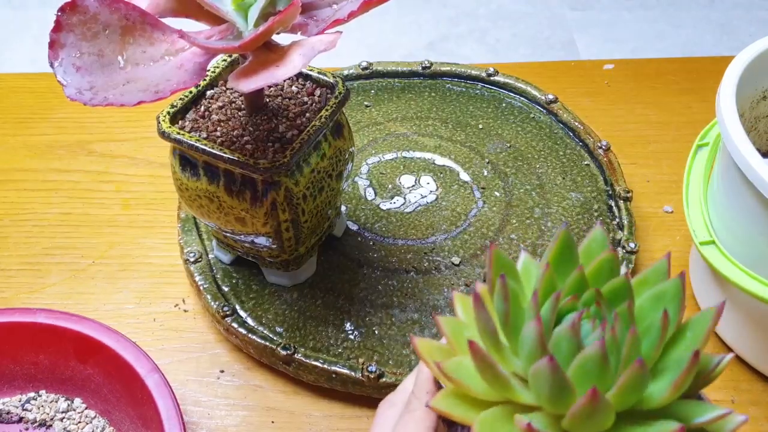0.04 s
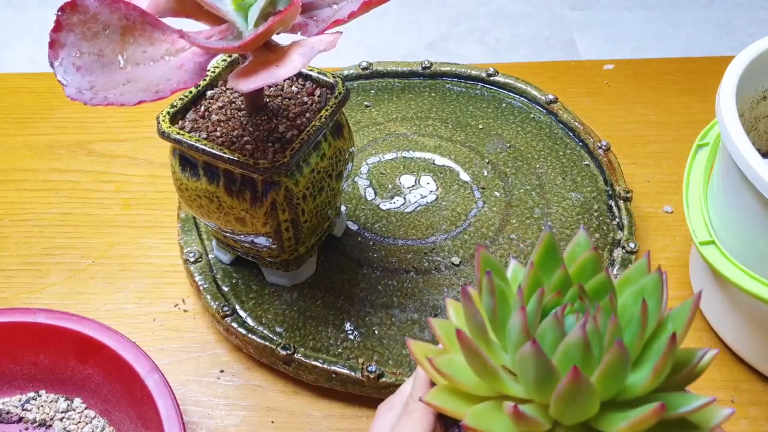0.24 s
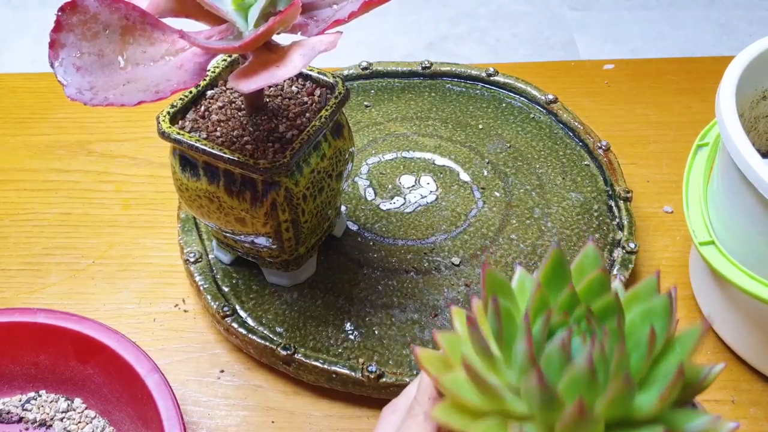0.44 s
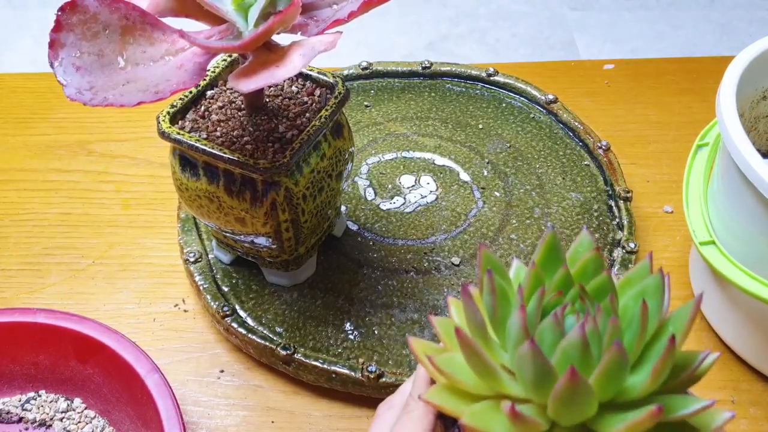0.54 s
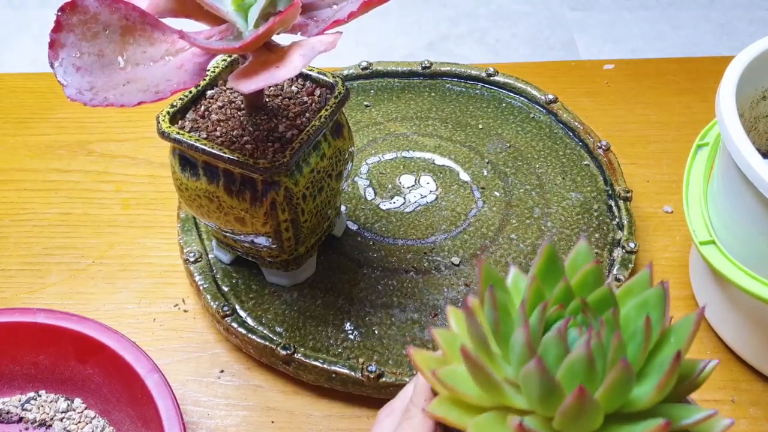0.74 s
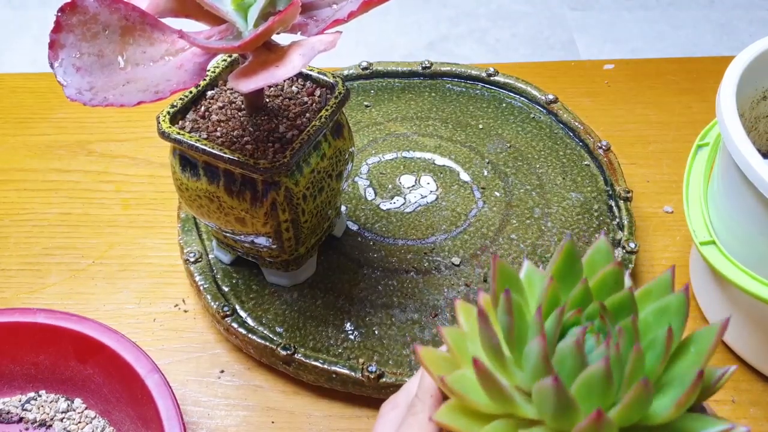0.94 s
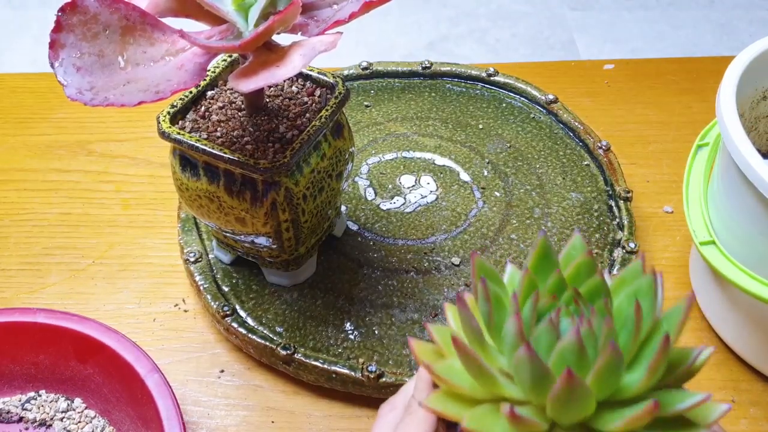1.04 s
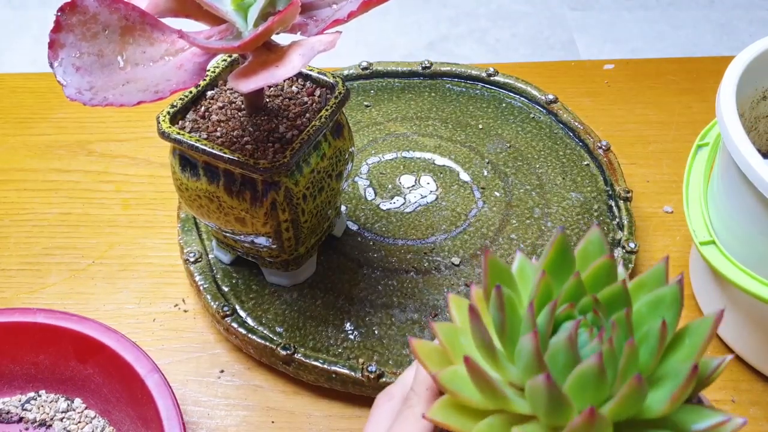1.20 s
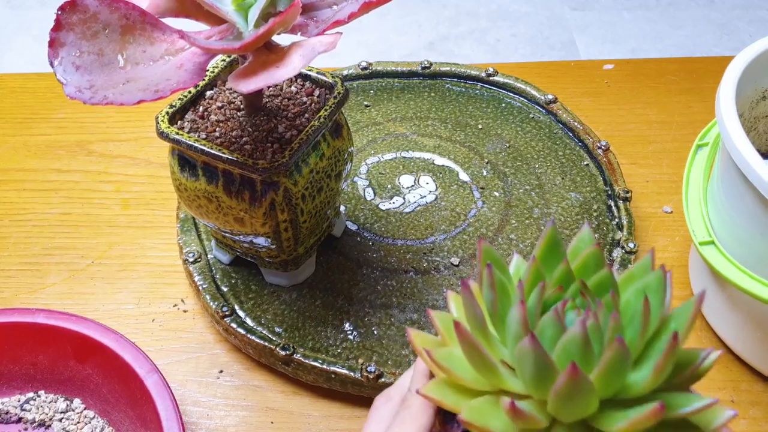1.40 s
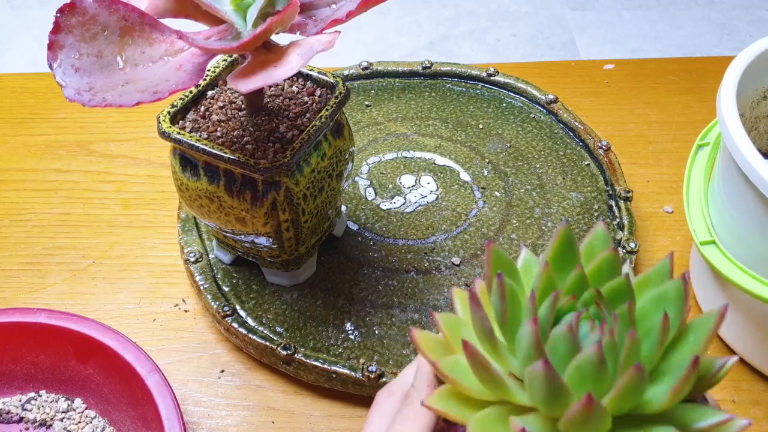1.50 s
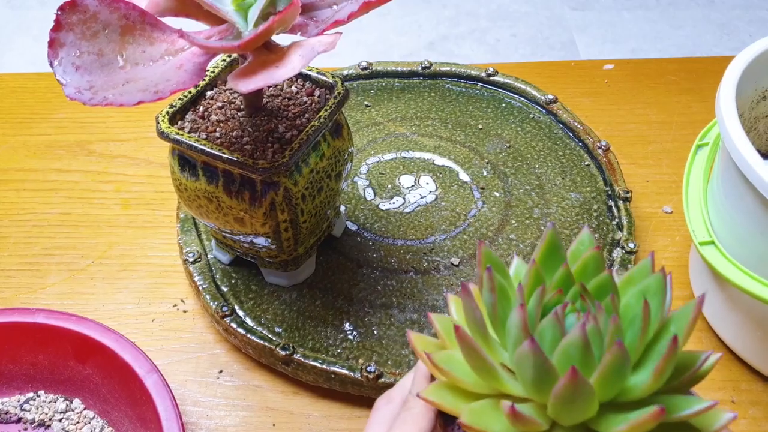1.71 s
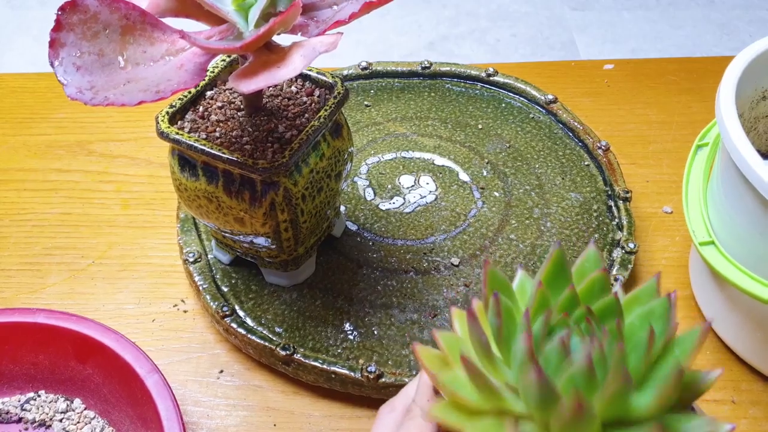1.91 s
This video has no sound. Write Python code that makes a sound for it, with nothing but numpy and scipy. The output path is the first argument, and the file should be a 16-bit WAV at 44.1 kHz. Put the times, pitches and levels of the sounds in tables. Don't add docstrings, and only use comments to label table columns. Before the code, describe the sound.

Six evenly spaced knocks of a glazed flowerpot on a table top, hollow and short, with soil grit shaking and occasional bright rim ticks; close stereo microphones, short room tail, very quiet background.

```python
import sys
import numpy as np
from scipy import signal
from scipy.fft import rfft, irfft
from scipy.io import wavfile

SR = 44100
rng = np.random.default_rng(int(sys.argv[2]) if len(sys.argv) > 2 else 0)


def int16_out(signal):
    q = np.round(np.clip(np.atleast_2d(signal).T, -1, 1) * 32767)
    wavfile.write(sys.argv[1], SR, q.astype(np.int16))


def attenuation_scalar(level_db):
    decades = np.asarray(level_db, float) / 20
    return 10 ** decades


N = 85995
LEAD = 4410


def ring(modes, gains_db, detune, size):
    hz, db, t60 = np.array(modes).T[:, :, None]
    t = np.arange(size) / SR
    level = attenuation_scalar(db + gains_db[:, None])
    decay = np.exp(-np.log(1000) * t / t60)
    return (level * decay * np.sin(2 * np.pi * hz * detune[:, None] * t)).sum(axis=0)


def curve_db(f, points):
    hz, db = np.array(points).T
    return np.interp(np.log(np.maximum(f, 1)), np.log(hz), db)


def colour(x, points):
    size = x.shape[-1]
    f = np.arange(size // 2 + 1) * SR / size
    return irfft(rfft(x) * attenuation_scalar(curve_db(f, points)), size)


def causal(x, points):
    f = np.arange(257) * SR / 512
    cepstrum = irfft(curve_db(f, points) * np.log(10) / 20)
    cepstrum = cepstrum * np.r_[1, 2 * np.ones(255), 1, np.zeros(255)]
    return signal.lfilter(irfft(np.exp(rfft(cepstrum))), 1, x)


# (time [s], level [dB], push length [ms], soil level [dB],
# bass pitch favoured by the struck spot [Hz])
CONTACTS = [(-.07, -16, 1.28, -34.5, 150), (.2100, -17.5, 0.83, -36.5, 211), (0.2148, -23, 0.93, -45, 236),
            (0.2637, -31, 2.0, -73, 221), (0.4913, -19.5, 2.05, -35, 178), (.5020, -28.5, 0.67, -60, 608),
            (.5150, -25, 3.2, -70, 146), (0.7772, -17.5, 1.02, -40, 216), (0.7844, -23, 0.97, -45, 476),
            (0.788, -26, 0.57, -48, 150), (1.0921, -21, 0.59, -34.5, 256), (1.1024, -24.5, 0.52, -41, 461),
            (1.117, -25.5, 1.63, -39.5, 394), (1.4023, -14.5, 1.44, -32.5, 199.6),
            (1.4160, -24, 0.42, -57.5, 221), (1.694, -22, 1.33, -32, 189), (1.7022, -36, 0.27, -65, 256)]
# (frequency [Hz], level [dB], t60 [s])
BOARD_MODES = [(146, -10.5, 0.054), (184.5, -14.5, 0.17), (221, -10, 0.057), (256, -3.5, 0.11),
               (395, -16, 0.063), (460.6, -1.5, 0.037), (539.2, -9, 0.057), (659.7, 5, 0.02)]
# (frequency [Hz], level [dB], t60 [s])
POT_MODES = [(780.6, 2.5, 0.023), (868, -11.5, 0.021), (1099.3, 10, 0.024), (1190, -12, 0.061),
             (1447, 2.5, 0.019), (1569, 5.5, 0.013), (1732, -3.5, .03), (1921, 1.5, 0.026),
             (2508, 1, 0.011), (2900, -4, 0.015)]


def knocks():
    size = 3 * LEAD
    longest_t60_s, build_s = .075, 0.0026
    spot_db, spot_detune, path_shift_rad = 1.5, .006, .9
    favour_db, favour_octaves, pot_db = 9, .15, -0.5
    modes = [(hz, db, min(t60, longest_t60_s)) for hz, db, t60 in BOARD_MODES + POT_MODES]
    hz = np.array(modes)[:, 0]
    is_pot = np.arange(len(modes)) >= len(BOARD_MODES)
    build = 1 - 0.75 * np.exp(-np.arange(size) / SR / build_s)
    out = np.zeros((3, N + 5 * LEAD))
    for s, db, push_ms, _, bass_hz in CONTACTS:
        length = push_ms * SR / 1000
        t = np.arange(int(2 * length))
        push = t * np.exp(-4 * t / length)
        gain_db = spot_db * rng.standard_normal(len(modes)) + pot_db * is_pot
        gain_db += favour_db * np.exp(-(np.log2(hz / bass_hz) / favour_octaves) ** 2)
        detune = 1 + spot_detune * rng.standard_normal(len(modes))
        body = build * ring(modes, gain_db, detune, size)
        hit = np.convolve(body, push / push.sum())[:size]
        angle = path_shift_rad * rng.standard_normal()
        shares = [1, np.cos(angle), np.sin(angle)]
        i = int(s * SR) + LEAD
        out[:, i:i + size] -= attenuation_scalar(db) * np.outer(shares, hit)
    return out[:, :N + LEAD]


# (frequency [Hz], level [dB])
GRIT_COLOUR = [(900, 6), (2000, 7), (4000, -1.5), (5200, -5.5), (7300, -7), (8600, -16), (10600, -15.5),
               (15500, -19)]


def soil():
    clicks_per_s, spread_db, width = 22000, 2, 1.27
    rise_s, burst_s, settle_s, settle_db = 0.0026, 0.0025, 0.027, -11.5
    t = (np.arange(N + LEAD) - LEAD) / SR
    shake = np.zeros(len(t))
    for s, _, _, soil_db, _ in CONTACTS:
        age = np.maximum(t - s, 0)
        fall = np.exp(-age / burst_s) + attenuation_scalar(settle_db) * np.exp(-age / settle_s)
        shake += attenuation_scalar(soil_db) * (1 - np.exp(-age / rise_s)) * fall
    shape = (2, len(t))
    lands = rng.random(shape) < clicks_per_s / SR
    size = attenuation_scalar(spread_db * np.minimum(rng.exponential(size=shape), 3))
    sign = np.sign(rng.standard_normal(shape))
    mid, side = causal(lands * size * sign * shake, GRIT_COLOUR) * np.sqrt(SR / clicks_per_s)
    return mid + width * side * np.array([[1], [-1]])


TAIL_RISE_S = .012
# (frequency [Hz], level [dB], t60 [s], left-right likeness [0-1])
TAIL_BANDS = [(82, -19, 0.37, .99), (163, -11, 0.35, 0.8), (257, -11, 0.48, 1), (472, -3, 0.38, 0.83),
              (1180, -7.5, 0.46, 0), (2690, -3.5, 0.47, 0.04), (6350, -6, 0.43, 0.84), (14200, -3, 0.3, 1)]


def tail():
    size = SR // 2
    t, table, out = np.arange(size) / SR, np.array(TAIL_BANDS), np.zeros((2, size))
    for hz in 50 * 2 ** np.arange(0, 8.4, .5):
        db, t60, like = (np.interp(np.log(hz), np.log(table[:, 0]), table[:, k]) for k in (1, 2, 3))
        sos = signal.butter(2, [hz / 2 ** .25, hz * 2 ** .25], "band", fs=SR, output="sos")
        mid, side = signal.sosfilt(sos, rng.standard_normal((2, size)))
        like = np.clip(like, 0, 1)
        pair = np.sqrt(1 + like) * mid + np.sqrt(1 - like) * side * np.array([[1], [-1]])
        decay = np.exp(-np.log(1000) * t / t60) / np.sqrt(SR * t60 / np.log(1e6))
        out += attenuation_scalar(db) * pair * decay
    return out * (1 - np.exp(-(t / TAIL_RISE_S) ** 2))


# (delay [s], left level [dB], right level [dB])
NEAR_ECHOES = [(0.014, -14.5, -12), (0.028, -22.5, -20), (0.0058, -14.5, -24)]
# (frequency [Hz], level [dB], t60 [s])
LOW_MODES = [(150, -60.5, 0.37), (191.4, -62, 0.5), (221, -76.5, 0.67), (256, -69, 0.46)]


def room(dry, path_a, path_b):
    size, zero = SR // 2, np.zeros(len(LOW_MODES))
    build = 1 - np.exp(-np.arange(size) / SR / TAIL_RISE_S)
    near = np.ones((2, 1)) * ring(LOW_MODES, zero, zero + 1, size) * build
    near[:, 0] = 1
    for s, left_db, right_db in NEAR_ECHOES:
        near[:, int(s * SR)] = attenuation_scalar(np.array([left_db, right_db]))
    paths = [(dry, near), (path_a, tail()), (path_b, tail())]
    return sum(signal.fftconvolve(x, h, axes=1)[:, LEAD:LEAD + N] for x, h in paths)


def faint_air():
    hiss = rng.standard_normal((2, N))
    return attenuation_scalar(-90) * colour(hiss, [(100, 6), (1000, 7), (4000, -1), (9000, -45)])


def low_rumble():
    hum = colour(rng.standard_normal((2, N)), [(15, 24), (32, 70.5), (50, 9), (200, -38)])
    return attenuation_scalar(-80) * (hum[0] + .3 * hum)


# (time [s], level [dB])
GLAZE_TICKS = [
    (0.22, -44),
    (0.4925, -33.5),
    (.7980, -51.5),
    (.8130, -56),
    (1.093, -30.5),
    (1.404, -38.5),
    (1.41, -51),
    (1.6950, -29.5),
    (1.6968, -29),
]
# (frequency [Hz], level [dB], t60 [s])
RIM_MODES = [(1852, 4, 0.049), (2330, -3, 0.0067), (4060, -6, 0.013), (4590, -2, 0.005),
             (6050, -1.5, 0.0051), (6510, -7.5, 0.013), (7540, 2, 0.0055), (11020, -12.5, 0.0075),
             (13100, -9, 0.0047)]


def glaze_ticks():
    longest_t60_s, rise_s = .009, .0004
    modes = [(hz, db, min(t60, longest_t60_s)) for hz, db, t60 in RIM_MODES]
    rise = 1 - np.exp(-np.arange(LEAD) / SR / rise_s)
    out = np.zeros(N + LEAD)
    for s, db in GLAZE_TICKS:
        gain_db = 3 * rng.standard_normal(len(modes))
        detune = 1 + .02 * rng.standard_normal(len(modes))
        i = int(s * SR) + LEAD
        out[i:i + LEAD] += attenuation_scalar(db) * ring(modes, gain_db, detune, LEAD) * rise
    return out


# (frequency [Hz], right louder by [dB])
RIGHT_LEAN = [(200, .3), (1200, 2), (2500, 1), (6000, 2), (13000, 1)]


def scene():
    hit, path_a, path_b = knocks()
    bright = soil() + glaze_ticks()
    left, right = room(hit + bright, path_a + bright, np.array([path_b, path_b]))
    wet = np.array([causal(left, np.array(RIGHT_LEAN) * [1, -1]), right])
    return wet + faint_air() + low_rumble()


def top_cut(x):
    return signal.sosfilt(signal.butter(12, 16810, fs=SR, output="sos"), x)


def record(dry):
    low_hz, top_hz = 119.2, 15750
    x = signal.sosfilt(signal.butter(3, low_hz, "high", fs=SR, output="sos"), dry)
    x = signal.sosfilt(signal.ellip(8, .2, 60, top_hz, fs=SR, output="sos"), x)
    return top_cut(x)


dry = scene()
out = record(dry)
int16_out(out)
```